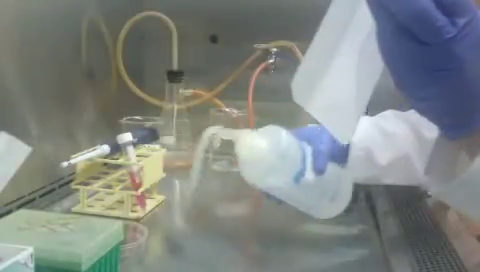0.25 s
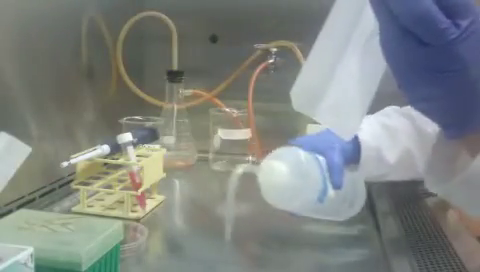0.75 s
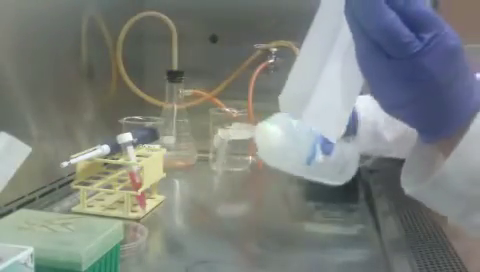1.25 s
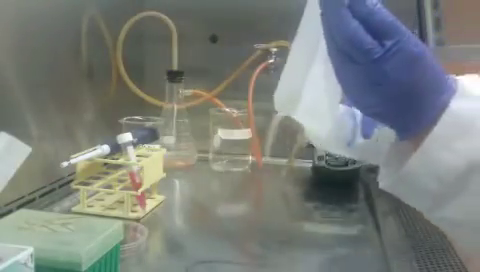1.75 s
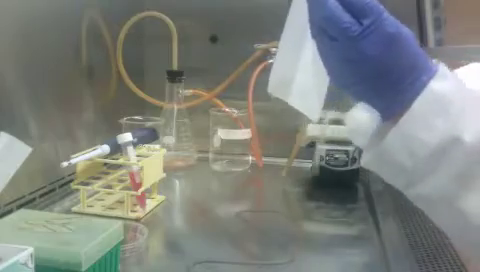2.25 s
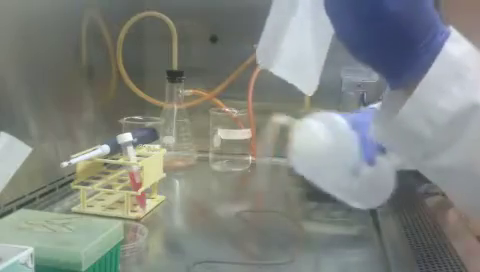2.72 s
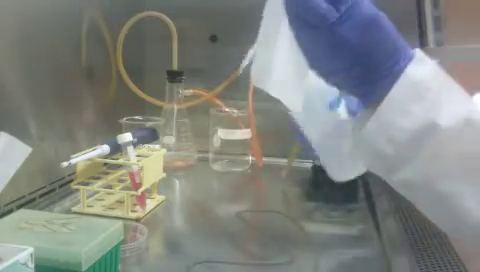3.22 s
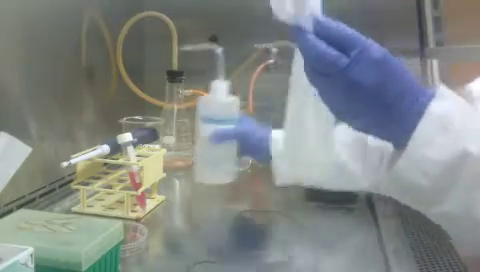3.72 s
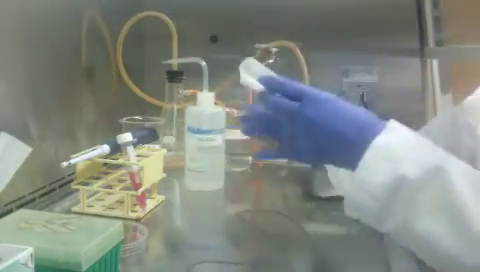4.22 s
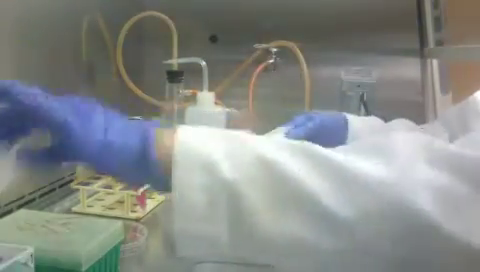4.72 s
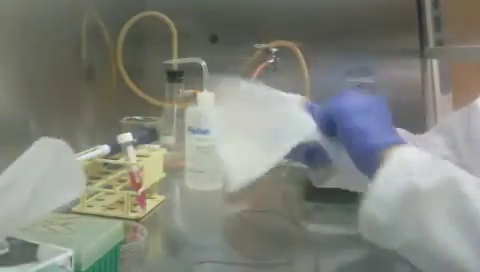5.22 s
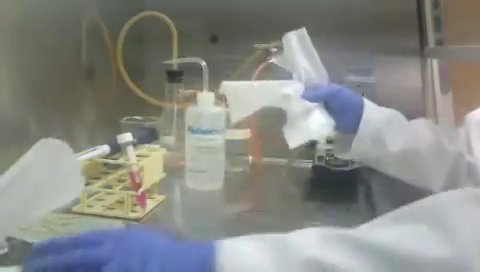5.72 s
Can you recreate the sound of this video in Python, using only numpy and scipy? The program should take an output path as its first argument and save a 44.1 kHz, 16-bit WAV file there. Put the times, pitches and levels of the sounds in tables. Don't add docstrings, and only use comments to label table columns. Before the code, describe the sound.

A steady fan hums low throughout, with soft air hiss, fluttering duct whistles and a thin wandering high whine. Very thin hard ticks click at about 0.05 s. From 0.55 to 0.72 s a paper sheet crumples with dry snaps and light taps; sharper crackles follow at 0.85 and 1.0 s. It then stays mostly fan, with faint sleeve drags and taps at 2.0-2.4 s and a small snap at 2.45. Water sloshes and bubbles in a plastic bottle at 3.1-3.4 s. At 3.96 s the bottle bangs down on sheet steel, by far the heaviest sound, ringing and washing out, with a light bright recontact at 4.05. Paper wipes at 4.35 s; a towel is yanked from a hollow box at 4.76-5.0 s, droning, jerking and ending in a loud snap. It opens and swishes to 5.45, then is pressed at 5.8 s with bumps and watery blips. Close microphone, short bright steel tail, limited peaks.

```python
import sys
import numpy as np
from scipy import signal
from scipy.fft import rfft, irfft
from scipy.io import wavfile
from scipy.ndimage import uniform_filter1d

SR = 44100
rng = np.random.default_rng(int(sys.argv[2]) if len(sys.argv) > 2 else 0)


def undo_db(level):
    steps = np.asarray(level, float) / 20
    return 10 ** steps


def file_out(sig):
    cols = np.atleast_2d(sig).T
    lim = np.clip(cols, -1, 1)
    pcm = np.round(lim * 32767).astype(np.int16)
    wavfile.write(sys.argv[1], SR, pcm)


N = 263277

# [f/Hz, level/dB per Hz]
CRUMPLE = [(59, -54), (100, -21), (513, -4.5), (784, -9), (872, -8.5), (1680, -1), (2200, -9.5),
           (3190, -6.5), (4600, -11), (9210, -6.5), (13500, -17), (16000, -32)]
FLICK = [(240, -30), (400, 7), (562, -8), (852, -20), (4880, -27), (5430, -15.5), (7280, 5), (16000, -21)]
SLEEVE = [(59, -42), (100, -17), (328, 2), (365, -3), (1100, -9.5), (6990, -25), (16000, -41)]
SLOSH = [(59, -48), (100, -15), (239, -5), (277, -24), (350, -19), (1010, -12), (1550, -4.5), (3200, -17.5),
         (3800, -18), (5800, -23), (7000, -20), (16000, -38)]
WIPE = [(300, -31), (690, -13), (1790, -0.5), (5000, 1.5), (8000, -3), (11000, -7), (13500, -17),
        (15000, -29.5)]
PULL = [(59, -59), (100, -27), (166, -3.5), (283, -21), (406, 1), (452, -23), (502, -11), (570, -7),
        (648, 2), (800, -2), (1520, -20.5), (3620, -18), (4500, -23.5), (8600, -25.5), (9820, -22.5),
        (12000, -31.5), (16000, -44)]
BRUSH = [(240, -28), (400, 7), (432, -8), (562, 4), (616, -3), (5780, -6), (16000, -26.5)]
UNFOLD = [(59, -62), (100, -2), (836, 5), (1720, -6), (2320, -4.5), (6420, -4.5), (7770, 2.5), (16000, -8)]
PRESS = [(59, -48), (100, -11.5), (662, -3), (1010, -15), (1520, -2), (1950, -11.5), (2590, -4), (2800, -8),
         (3150, 0), (3500, -5.5), (3800, -11.5), (10000, -9), (16000, -32)]
SWISH = [(100, -31), (836, -13), (2300, -4), (6000, -8), (7600, 0.5), (8900, -7), (10100, 3), (11300, -17),
         (12600, -5), (14000, -21), (16000, -18)]
# [f/Hz, level/dB per Hz]
CRACK = [(59, -54), (100, -19), (513, -16), (872, -13), (2080, -7), (3190, -6), (9210, -6.5), (13500, -4),
         (16000, -34)]
# [f/Hz, level/dB per Hz]
SHEET_WASH = [(55, -19), (130, -11), (240, -7), (430, -9.5), (640, -10), (1180, -8), (1720, -14),
              (2900, -11), (4300, -14), (9000, -14), (16000, -21)]


def seconds(samples):
    return np.arange(samples) / SR


def sine(hz, t):
    return np.sin(2 * np.pi * hz * t)


def unit(x):
    return x / np.sqrt(np.mean(x ** 2))


def shape(x, points, lo=0., hi=1e5):
    hz = np.arange(len(x) // 2 + 1) * SR / len(x) + 1
    f, db = np.transpose(points)
    colour = undo_db(np.interp(np.log(hz), np.log(f), db))
    edges = 1 / np.sqrt((1 + (lo / hz) ** 8) * (1 + (hz / hi) ** 8))
    return unit(irfft(rfft(x) * colour * edges, len(x)))


def ring(x, hz, width):
    b, a = signal.iirpeak(min(hz, SR / 2.2), max(hz / width, .5), fs=SR)
    return unit(signal.lfilter(b, a, x))


def steep(x, hz, width):
    return ring(ring(x, hz, width), hz, width)


def fade(t, t60):
    return undo_db(-60 * t / t60)


def swell(t, rise_s):
    return 1 - np.exp(-(t / rise_s) ** 3)


def walk(rate):
    k = int(SR / rate)
    return uniform_filter1d(np.repeat(rng.standard_normal(N // k + 1), k), k)[:N]


def add(out, x, s):
    i = int(s * SR)
    out[i:i + len(x)] += x[:len(out) - i]


def grains(size, rate, scatter_db, count=40):
    out = 0
    for hz in 300 + 15500 * ((np.arange(count) + rng.random(count)) / count) ** 1.6:
        chance, luck = rng.random((2, size))
        strength = undo_db(np.minimum(-scatter_db * np.log(1 - luck), 9))
        catches = (chance < rate / count / SR) * strength
        out = out + hz ** 0.27 * steep(catches + .001 * luck, hz, 110 + 0.0056 * hz)
    return out / out.std()


def rub(rise, hold, release, colour, rate, patchy, share, body_db, top_db):
    # [f/Hz, width/Hz, level/dB, loudest at share of the pull]
    box = [(380, 90, -4.5, 0.56), (513, 20, 5, 0.74), (657, 50, 3, 0.34), (720, 14, -15, 0.22),
           (1215, 60, -5, 0.4)]
    depth_db = 30
    t = np.arange(0, min(rise + hold + release, .5), 1 / SR)
    corners = [0, rise, rise + hold, rise + hold + release]
    under_db = depth_db * np.interp(t, corners, [1, 0, 0, 1])

    patchy = np.clip(patchy, 0, 1)
    slip = patchy * grains(len(t), rate, scatter_db=2.5) + (1 - patchy) * rng.standard_normal(len(t))
    bounce_ms = .34 if colour == CRUMPLE else .39
    slip = slip + min(share, 1) * np.roll(slip, int(bounce_ms * SR / 1000))

    body = shape(slip, colour, hi=900.0)
    if colour == PULL:
        pulled = t / t[-1]
        drone = sum(undo_db(db - 60 * (pulled - at) ** 2) * ring(slip, hz, width) for hz, width, db, at in box)
        body = 0.66 * body + 0.5 * drone
        body = body * undo_db(5 * np.sin(np.pi * pulled) ** 2)
    body = body * undo_db(body_db + 0.26 * under_db)
    middle = shape(slip, colour, lo=1365.0, hi=4740.0)
    top = shape(slip, colour, lo=6100.0) * undo_db(top_db - 0.54 * under_db)
    ends = np.minimum(1, (depth_db - under_db) / 2.2)
    return (body + middle + top) * undo_db(-under_db) * ends


def rubs():
    strokes = [
        [(0.554, 0.078, 0.02, 0.063, -24.5)],
        [(0.777, 0.064, 0.012, .01, -58)],
        [(2.04, 0.0085, .01, 0.27, -52.5), (2.11, 0.042, 0.038, 0.051, -59), (2.31, 0.023, 0.013, 0.084, -54.5)],
        [(3.17, .12, 0.0045, .17, -38.5), (3.203, 0.012, .03, 0.07, -44), (3.35, .04, 0.053, 0.061, -50)],
        [(3.763, 0.063, 0.14, 0.096, -56)],
        [(4.336, 0.036, 0.0075, 0.1, -30.5)],
        [(4.348, 0.062, 0.044, 0.049, -36)],
        [(4.46, 0.07, 0.42, 0.046, -56)],
        [(4.762, 0.065, 0.12, 0.079, -24.5)],
        [(4.921, 0.034, 0.042, 0.084, -33.5)],
        [(5.02, 0.073, .01, 0.32, -45), (5.17, 0.025, .002, 0.11, -41.5), (5.2, 0.072, 0.061, 0.089, -47.5)],
        [(5.268, 0.081, 0.034, 0.11, -36.5)],
        [(5.806, 0.025, 0.023, .1, -31.5), (5.87, 0.067, .1, 0.055, -54.5)],
        [(1.64, 0.026, .02, 0.056, -59), (4.21, .05, .03, .04, -54.5), (5.38, 0.034, 0.03, 0.73, -53)],
    ]
    # [colour, fibre catches/s, patchiness 0-1, share bounced off the steel 0-1,
    # body level/dB, top sizzle level/dB]
    contacts = [(CRUMPLE, 2700, 0.41, 0.25, -6.5, -10), (FLICK, 3500, 0.35, .3, 2.2, 16),
                (SLEEVE, 1600, 0.19, 0.078, 1.3, -8.5), (SLOSH, 3300, 0.45, 0.26, -12.5, -24),
                (BRUSH, 4600, 0.35, 0.08, -6, -1), (WIPE, 3600, 0.37, 0.092, -9, -6.5),
                (WIPE, 4500, 0.45, 0.1, -35, 1.8), (BRUSH, 2000, 0.25, 0.16, 0.94, -2.3),
                (PULL, 5500, 0.39, 0.017, -0.74, -1.5), (PULL, 6100, 0.42, 0.06, -4.5, 0),
                (UNFOLD, 2200, 0.25, 0.1, -23, -16), (SWISH, 5500, 0.44, 0.26, -10.5, -1.5),
                (PRESS, 3900, 0.29, 0.099, -7, -6.5), (WIPE, 3700, 0.33, 0.16, -3.5, -3.5)]
    out = np.zeros(N)
    for rows, contact in zip(strokes, contacts):
        for s, rise, hold, release, db in rows:
            add(out, undo_db(db) * rub(rise, hold, release, *contact), s)
    return out


def pings(rows):
    out, t = np.zeros(N), seconds(SR // 8)
    for s, db, hz, t60 in rows:
        add(out, undo_db(db) * sine(hz, t) * fade(t, t60) * (1 - fade(t, 0.0032)), s)
    return out


def jerks():
    # [t/s, peak level/dB, f/Hz]
    jolts = [(4.797, -29, 640), (4.807, -16.5, 672), (4.833, -10.5, 717), (4.838, -33, 380),
             (4.853, -9, 704), (4.866, -6.5, 676), (4.882, -7, 620), (4.890, -9, 518), (4.906, -19, 610),
             (4.926, -14, 652), (4.936, -11, 483), (4.945, -16, 373), (4.952, -11, 663.5)]
    return pings([(s, db, hz, 0.071) for s, db, hz in jolts])


def taps():
    # [t/s, peak level/dB, f/Hz]
    touches = [(.550, -41, 328), (.599, -29, 560), (.735, -25, 290), (.604, -25, 645), (.616, -24.5, 464),
               (.623, -31, 700), (.641, -28, 765), (.648, -24, 710), (.707, -29, 685), (2.049, -44, 2200),
               (2.061, -52, 517), (2.139, -43, 900), (2.158, -40, 1050), (2.189, -43, 780),
               (2.345, -49, 415), (4.872, -14, 760), (4.916, -28, 3500), (3.090, -34, 2850),
               (3.094, -31, 2620), (3.100, -31, 2980), (3.284, -37, 4600), (3.299, -28, 3320),
               (3.309, -33, 3450), (3.242, -34, 2010), (3.263, -38, 2600), (3.326, -36, 2550),
               (3.350, -39, 2800), (3.296, -36, 6650), (3.259, -40, 5830), (3.212, -32, 5870),
               (3.434, -49, 1850), (3.450, -46, 4030), (4.372, -24, 1490), (.847, -34, 3400),
               (.857, -38.5, 417), (1.017, -36, 450), (4.757, -40, 690), (4.789, -29, 660),
               (5.055, -39, 720), (5.195, -38, 4630), (5.811, -35, 610), (5.843, -31, 1580),
               (5.346, -34, 786), (5.388, -44, 2170)]
    return pings([(s, db, hz, 0.011 + 16.4 / hz) for s, db, hz in touches])


def snaps():
    # [t/s, peak level/dB, strongest f/Hz, broad crack level/dB]
    creases = [(.546, -24.5, 3260, -8), (.576, -17, 2900, -5), (0.596, -26, 2920, 2),
               (0.606, -11, 1900, -2.5), (0.708, -26.5, 3000, 11.5), (0.842, -15.5, 5080, -16),
               (0.852, -17, 5200, -8), (.850, -21, 3420, -20), (.852, -14.5, 7560, 2.5),
               (1.003, -15.5, 4540, -12), (1.005, -24, 5350, -23), (1.007, -21.5, 3560, -14),
               (0.61, -25, 1720, -4), (5.811, -35, 1840, 8), (1.003, -22, 8700, -22),
               (2.451, -18.5, 7170, -24), (2.455, -27.5, 3270, -20), (4.350, -20, 2700, -8),
               (4.791, -17.5, 3270, -5), (4.805, -15.5, 3600, 6.5), (4.9608, -5, 3350, 2),
               (5.194, -24.5, 4600, -15), (5.196, -26, 2400, -14), (5.818, -15.5, 3000, -6)]
    # [t/s, peak level/dB, strongest f/Hz, broad crack level/dB]
    sizzles = [(0.5755, -29, 8650, -16), (1.003, -44, 14300, -12), (1.004, -36, 12300, -10),
               (2.0144, -39, 8800, -20), (2.578, -47, 10800, 7), (3.09, -38, 9400, -16),
               (4.266, -30.5, 12500, 4.5), (4.274, -19.5, 9600, -11), (4.7866, -17, 10400, -4),
               (.547, -36, 8600, -20), (5.1866, -29, 10000, -16), (5.193, -33, 13500, -16),
               (5.194, -40, 15300, -20)]
    out, t = np.zeros(N), seconds(SR // 4)
    rows = [(*r, 0.19, 0.077) for r in creases] + [(*r, 0.07, 0.039) for r in sizzles]
    for s, db, hz, crack_db, share, tail in rows:
        tail = tail * undo_db(0.9 * max(crack_db - 3.5, 0))
        noise = rng.standard_normal((2, len(t))) + grains(len(t), 4000, 5.6, count=24)
        combed = noise[1] + 0.17 * np.roll(noise[1], int(SR / hz))
        broad = shape(combed, CRACK, lo=0.21 * hz, hi=2.9 * hz)
        crack = steep(noise[0], hz, share * hz) + undo_db(crack_db) * broad
        decay = fade(t, tail) + 0.67 * fade(t, 0.0043)
        add(out, undo_db(db - 14.5) * crack * decay * np.minimum(t / 0.00022, 1), s)
    return out


def ticks():
    # [t/s, peak level/dB]
    hits = [(.0464, -30), (.0581, -9)]
    # [f/Hz, level/dB per Hz]
    tick_colour = [(7600, -38), (9600, -4), (14500, -8), (17000, -27)]
    out, t = np.zeros(N), seconds(SR // 4)
    for s, db in hits:
        thin = (t == 0) + rng.standard_normal(len(t)) * undo_db(-51) * fade(t, 0.055)
        thin = shape(np.roll(thin, SR // 100), tick_colour)
        add(out, undo_db(db) * thin / np.abs(thin).max(), s - 1 / 100)
    return out


def clicks():
    # [t/s, peak level/dB, lowest f/Hz, highest f/Hz]
    cracks = [(0.595, -22, 5000, 12000), (0.6055, -22, 1500, 4000), (0.6428, -11, 1500, 9000),
              (0.652, -15, 2500, 12000), (0.712, -18, 2180, 12000), (.716, -17, 11000, 15000),
              (0.846, -17.5, 3000, 6000), (0.8523, -13, 4500, 10000), (1.01, -22, 3500, 5000),
              (1.008, -32, 1800, 2500), (3.211, -32, 4000, 6300), (3.259, -41, 5000, 6500),
              (3.297, -43, 6200, 7160), (3.9685, -15, 4000, 14000), (4.356, -27, 9500, 10500),
              (4.437, -20, 4000, 9000), (5.786, -39, 2500, 4500)]
    out, t = np.zeros(N), seconds(SR // 20)
    for s, db, lo_hz, hi_hz in cracks:
        burst = shape(rng.standard_normal(len(t)), CRACK, lo=lo_hz, hi=hi_hz)
        add(out, undo_db(db - 9) * burst * fade(t, 0.014) * np.minimum(t / 0.00025, 1), s)
    return out


def knock():
    # [f/Hz, level/dB, ring t60/s]
    sheet = [(157, -0.5, 0.35), (205.4, -3, 0.25), (103.8, -9.5, 0.4), (240.3, 1.5, 0.3), (265, 7.5, 0.14),
             (279, -11, 0.53), (393, -9.5, 0.52), (525, -3, 0.32), (621.4, 5.5, 0.18), (725, -3.5, 0.37),
             (747, -16, 0.48), (815, -31, 0.83), (954, -12, 0.46), (1048, -7, 0.36), (1120, -10, 0.36),
             (1187, 8, 0.16), (1310, -7, 0.17), (1540, -24, 0.197), (1900, 1, 0.096), (1970, -6, 0.13),
             (2400, -24.5, 0.16), (2600, -9, 0.21), (2400, -8, .17), (349.5, -11.5, 0.65), (645, -2, 0.27),
             (682, -2.5, 0.27), (476, -7, 0.27), (591, -2, 0.29), (876, -12, .4), (427, -6.5, 0.36)]
    # [f/Hz, t60/s]
    sheet_decay = [(60, 1), (150, 0.52), (400, 0.52), (1000, 0.31), (3000, 0.27), (8000, 0.18),
                   (14000, 0.091)]
    out, t = np.zeros(N), seconds(SR)
    middle_late_s = .035

    modes = 0
    for hz, db, t60 in sheet:
        rise_s = 0.009 if hz < 300 else middle_late_s if hz < 500 else 0.014
        mode = np.sin(2 * np.pi * (hz * t + rng.random()))
        modes = modes + undo_db(db) * mode * fade(t, t60) * swell(t, rise_s)

    bass, rise = 0.15 + swell(t, 0.006), 0.15 + swell(t, 0.013)
    late = 0.08 + 0.9 * np.clip((t - 0.0089) / 0.0007, 0, 1)
    noise, wash = shape(rng.standard_normal(SR), SHEET_WASH), 0
    f, t60s = np.transpose(sheet_decay)
    for hz in 50 * 2 ** np.arange(0, 8.5, .5):
        sos = signal.butter(2, [hz / 2 ** .25, hz * 2 ** .25], "band", fs=SR, output="sos")
        band = signal.sosfilt(sos, np.roll(noise, int(hz)))
        if 300 < hz < 500:
            onset = swell(t, middle_late_s)
        else:
            onset = bass if hz < 900 else rise if hz < 3000 else late
        wash = wash + band * onset * fade(t, np.interp(np.log(hz), np.log(f), t60s))

    grille = undo_db(-31.5) * (sine(866, t) + .5 * sine(866 + 13, t)) * fade(t, 0.9)
    add(out, undo_db(3.5) * (undo_db(-10.5) * modes + undo_db(-2.0) * wash + rise * grille), 3.960)
    return out


def bounce():
    out, t = np.zeros(N), seconds(SR)
    treble = shape(rng.standard_normal(SR), SHEET_WASH, lo=5000.0, hi=13000.0)
    decay = fade(t, 0.085) + undo_db(-17) * fade(t, .4)
    add(out, undo_db(-24) * treble * decay * (1 - fade(t, 0.013)), 4.054)
    return out


def drips():
    # [t/s, peak level/dB, f/Hz, splash f/Hz, splash level/dB]
    bubbles = [(0.084, -45.5, 2580, 5430, -17), (1.0833, -42, 2640, 5010, -15),
               (2.053, -36, 1760, 2120, -0.5), (2.472, -37, 2400, 7600, -13),
               (2.4878, -40, 3240, 7550, -14), (2.581, -39.5, 2710, 6390, -6),
               (3.0054, -40, 2100, 4470, -14), (3.0884, -25.5, 2720, 9300, -28),
               (3.0995, -35, 2980, 3200, -17), (3.112, -40, 2700, 4350, -16),
               (3.1778, -30.5, 1825, 2880, -9), (3.212, -31.5, 1900, 5550, 0), (3.22, -35, 3250, 4570, 1),
               (3.240, -30, 1900, 5440, -8), (3.245, -40, 3340, 4500, -5), (3.257, -32, 3200, 5600, -7),
               (3.270, -29.5, 3040, 1760, -2), (3.277, -26, 2380, 4610, -17),
               (3.292, -19.5, 2890, 5350, -11), (3.298, -27, 1560, 4580, -3.5),
               (3.3222, -29.5, 2640, 5470, -18), (3.311, -29, 2770, 4580, -9),
               (3.337, -33, 2700, 5530, -14), (3.3474, -33, 2700, 4680, -14), (3.361, -40, 2660, 1810, -1),
               (3.380, -42, 2690, 3970, -12), (3.391, -31, 1340, 5570, -12), (3.706, -47, 2040, 6530, 4),
               (5.0646, -35, 2640, 5470, -3), (5.1178, -31, 2760, 4500, -11), (5.841, -29, 1600, 2400, -14),
               (5.858, -23, 2570, 3450, -2), (5.883, -28.5, 2500, 1710, 2), (5.901, -29, 2510, 3420, -10),
               (5.912, -30, 2610, 1730, -5), (5.941, -34, 2620, 5340, -24), (5.947, -27.5, 2600, 5330, -16)]
    out, t = np.zeros(N), seconds(SR // 6)
    onset = np.sin(np.minimum(t / 0.0044, 1) * np.pi / 2) ** 2
    for s, db, hz, upper_hz, upper_db in bubbles:
        noise = rng.standard_normal(len(t))
        bubble = sine(hz, t * (1 + 1.7 * t)) + 0.84 * steep(noise, hz, 0.15 * hz)
        splash = sine(upper_hz, t) + 0.53 * steep(noise, upper_hz, 0.32 * upper_hz)
        add(out, undo_db(db - 4) * (bubble + undo_db(upper_db) * splash) * fade(t, 0.039) * onset, s)
    return out


def bumps():
    # [t/s, peak level/dB, f/Hz, ring t60/s]
    thuds = [(.722, -21, 279, 0.1), (.72, -45, 895, 0.069), (0.847, -33, 592, 0.069),
             (0.848, -59, 1210, 0.09), (1.012, -32, 511, 0.081), (1.018, -32, 335, 0.13),
             (2.055, -57, 607, 0.074), (4.722, -42, 692, 0.4), (2.191, -38, 895, 0.058),
             (2.335, -40.5, 450, 0.17), (3.093, -25.5, 2060, 0.035), (5.815, -13.5, 733, 0.034),
             (5.817, -27, 1212, 0.12), (5.897, -24.5, 685, 0.081), (5.911, -31, 765, 0.07),
             (5.922, -27, 523, 0.11), (5.936, -35, 504, 0.098), (5.955, -34, 700, 0.08)]
    out, t = np.zeros(N), seconds(SR // 3)
    for s, db, hz, t60 in thuds:
        panel = sine(hz, t) + 0.51 * steep(rng.standard_normal(len(t)), hz, 0.74 * hz)
        add(out, undo_db(db) * panel * fade(t, t60) * (1 - fade(t, 0.072)), s)
    return out


def fan():
    # [t/s, level/dB]
    fan_level = [(0, -53), (.5, -55.5), (0.802, -47), (1.3, -51), (2.0, -51), (2.6, -50.5), (3.1, -53),
                 (3.5, -49), (3.851, -51.5), (4.6, -47), (5.2, -47), (5.6, -52), (5.97, -50.5)]
    # [f/Hz, level/dB per Hz]
    fan_air = [(30, -13), (55, -15.5), (120, -9), (204, -3.5), (245, -3), (384, -15), (461, -17.5),
               (1130, -16), (1590, -22.5), (4200, -26.5), (8000, -31.5), (10500, -35.5), (13000, -44),
               (16000, -57)]
    # [f/Hz, width/Hz, level/dB against the hiss]
    whistles = [(1096, 6.2, -11), (1450, 20, -52), (2700, 37, -17), (4060, 33, -15), (5080, 20, -22),
                (5350, 16, -20), (7550, 39, -19.5), (8100, 15, -25), (10800, 48, -50), (12225, 40, -36),
                (14800, 400, -32)]
    hum = shape(rng.standard_normal(N), fan_air, hi=510.0) * undo_db(0.5 * walk(2.66))
    air = shape(rng.standard_normal(N), fan_air, lo=484.0) * undo_db(0.15 * walk(29) - 1.0)
    for hz, width, db in whistles:
        air = air + undo_db(db) * ring(rng.standard_normal(N), hz, width)
    whine_cycles = np.cumsum(4156 + 14.32 * walk(25)) / SR
    air = air + undo_db(-10 + 5.1 * walk(55)) * np.sin(2 * np.pi * whine_cycles)
    s, level_db = np.transpose(fan_level)
    return (hum + air * undo_db(-3.0)) * undo_db(np.interp(seconds(N), s, level_db))


def cabinet(x):
    t = seconds(SR // 3)
    walls = rng.standard_normal(len(t)) * fade(t, 0.09) * np.minimum(t / 0.0017, 1)
    return undo_db(-7) * signal.fftconvolve(x, walls / np.sqrt(np.sum(walls ** 2)))[:N]


def scene():
    paper = rubs() + jerks() + taps()
    near = snaps() + ticks() + clicks() + drips() + bumps()
    tail = cabinet(near + 0.32 * paper)
    return (paper + near + tail + knock() + bounce() + fan())[None]


def low_pass(x):
    return signal.sosfilt(signal.butter(12, 16720, fs=SR, output="sos"), x)


def record(dry):
    x = signal.sosfilt(signal.butter(3, 75, "high", fs=SR, output="sos"), dry)
    x = .88 * x / (.88 ** 3 + np.abs(x) ** 3) ** (1 / 3)
    x = signal.sosfilt(signal.butter(3, 55, "high", fs=SR, output="sos"), x)
    x = .87 * x / (.87 ** 8 + x ** 8) ** (1 / 8)
    x = signal.sosfilt(signal.ellip(10, .2, 55, 15850, fs=SR, output="sos"), x)
    return low_pass(x)


dry = scene()
out = record(dry)
file_out(out)
```